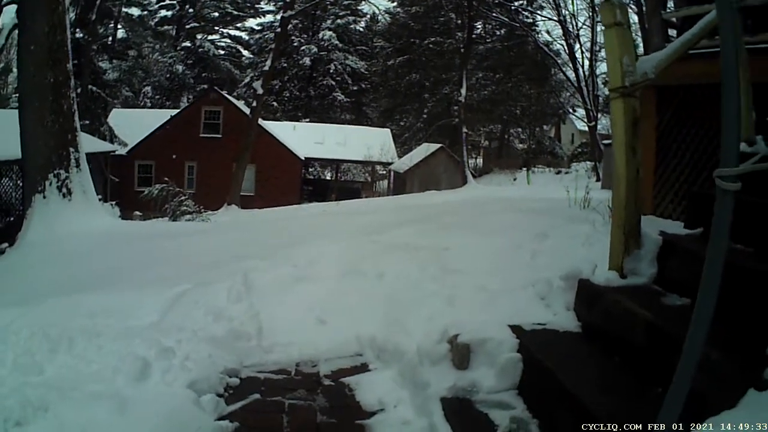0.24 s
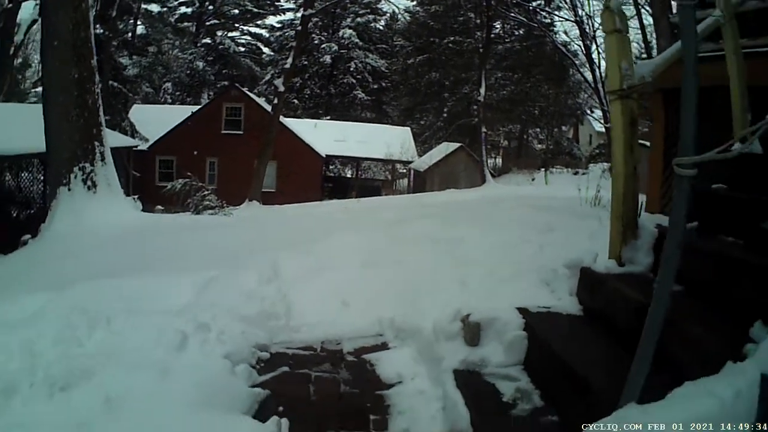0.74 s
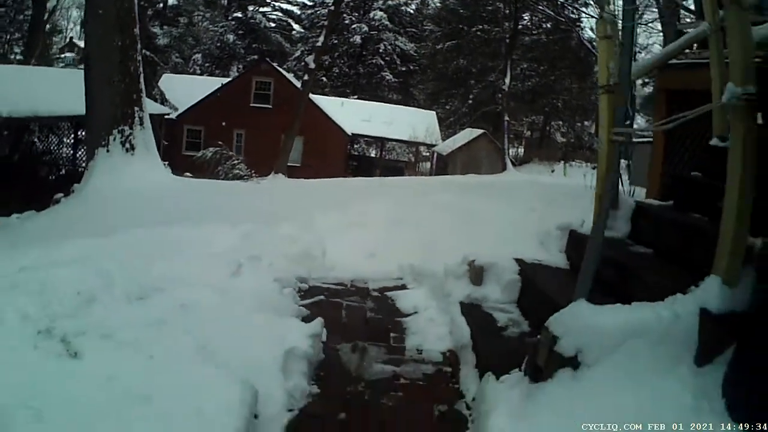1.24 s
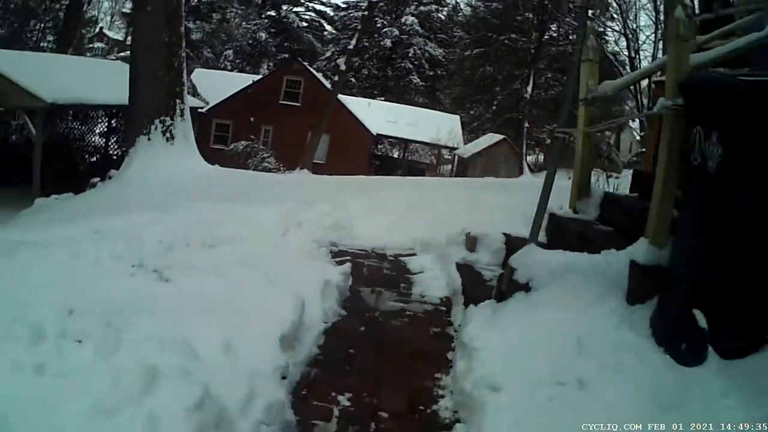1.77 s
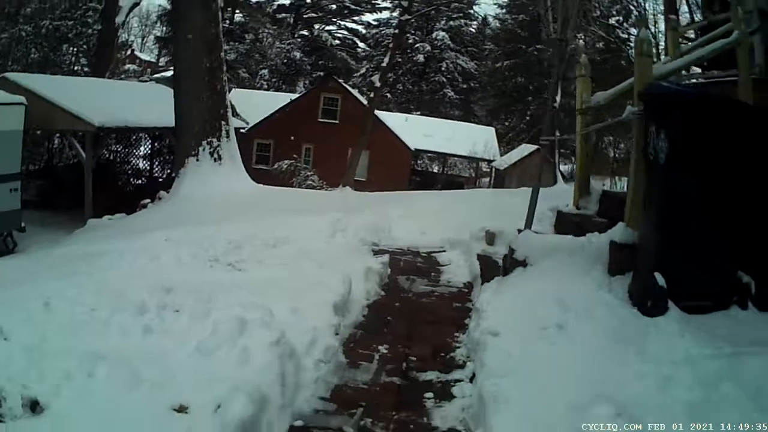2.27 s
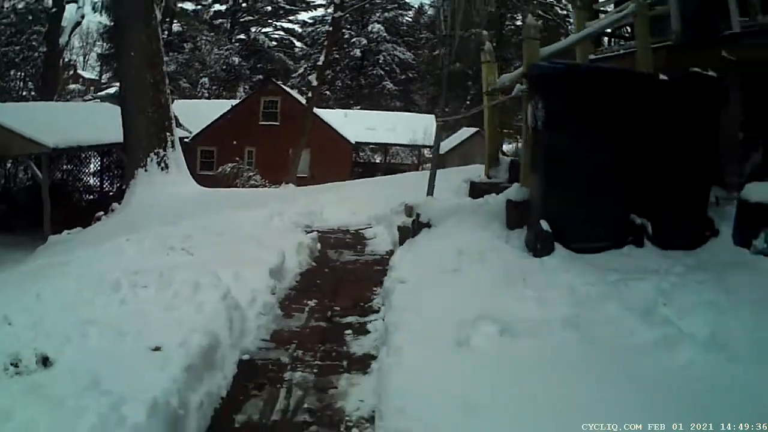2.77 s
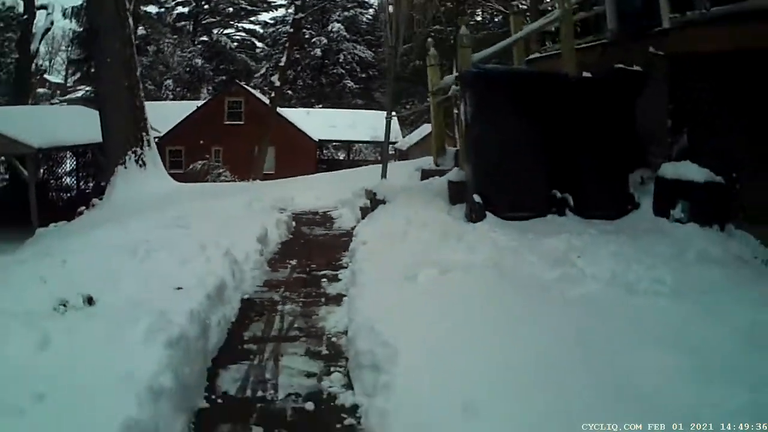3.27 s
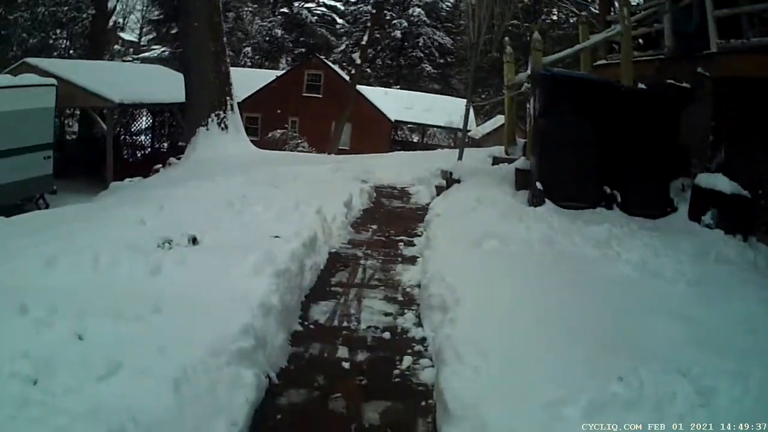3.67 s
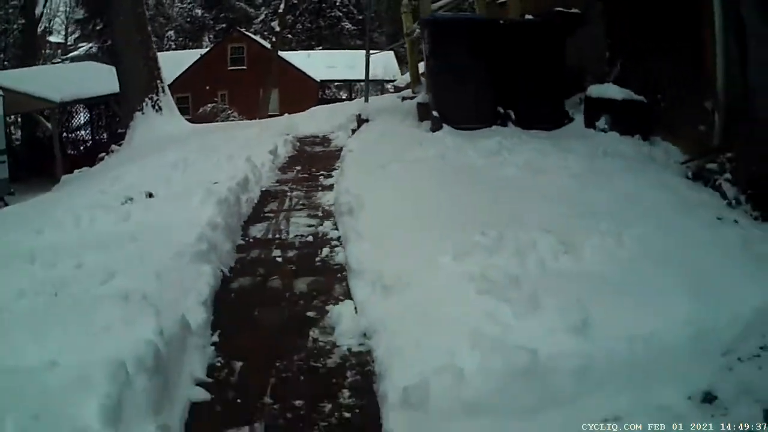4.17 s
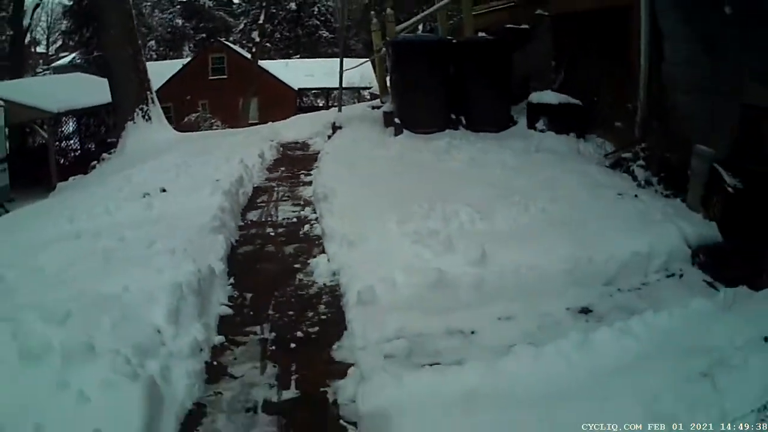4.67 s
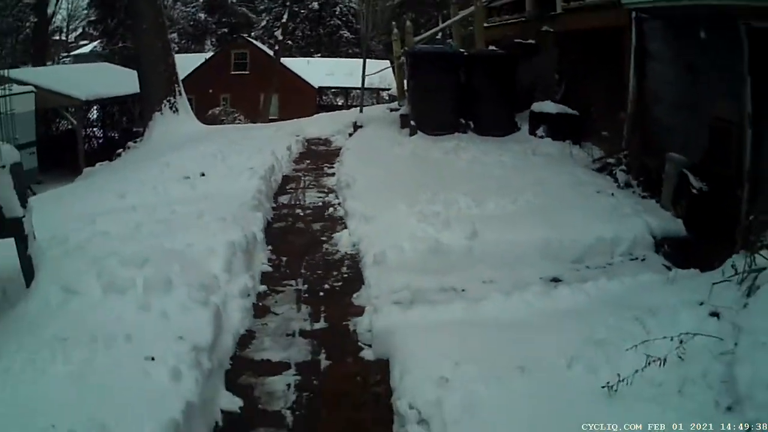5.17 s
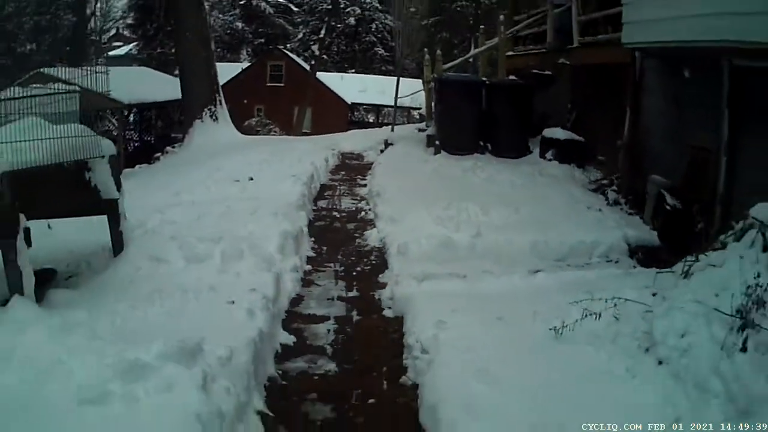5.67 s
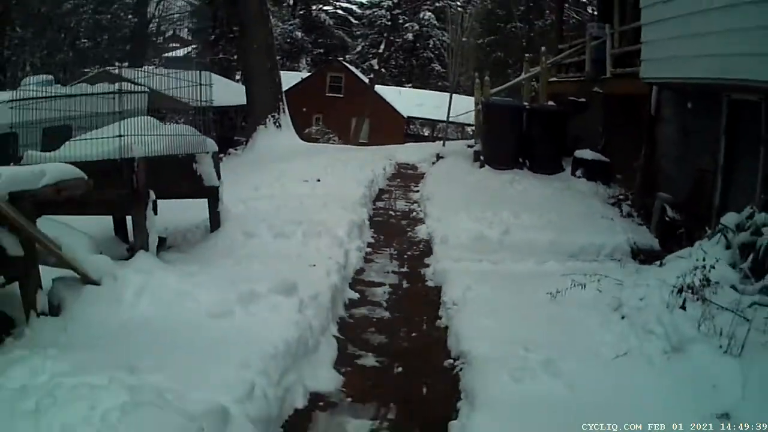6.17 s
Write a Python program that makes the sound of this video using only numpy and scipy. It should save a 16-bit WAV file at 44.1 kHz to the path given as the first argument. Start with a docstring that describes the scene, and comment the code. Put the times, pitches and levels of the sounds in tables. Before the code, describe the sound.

A faint outdoor hush and microphone hiss open the sound, with two light ticks at about half a second. Around 1 second a bicycle starts rolling slowly over a brick path, bringing a low, uneven rumble from the tyres and swaying frame, with faint crackling grit underneath. Bricks give irregular dull thumps, each with a short burst of plastic chatter from a mount, and small hard parts tick throughout. The rattling is stronger near 2 seconds and strongest just after 3 seconds, with closely spaced bumps until about 4.2 seconds. Another strong cluster with a sharp tick comes near 4.9 seconds. The ride eases briefly, then lighter bumps return from 5.7 seconds to the end at about 6.4. From 2.2 seconds on, a loose part occasionally gives a hollow knock. Everything is fairly quiet, close and without echo, heard from the bicycle itself.

```python
"""A quiet outdoor hush and microphone hiss, then a bicycle rolls slowly off down a brick path cleared
of snow, heard from a camera mounted on it. The frame sways, the tyres rumble, grit crackles and
small hard parts tick. Uneven bricks thump the frame and make the camera chatter in its plastic
mount; now and then a loose part falls back with a hollow knock."""
import sys
import numpy as np
from scipy.fft import rfft, irfft, next_fast_len
from scipy.io import wavfile
from scipy.ndimage import uniform_filter1d, map_coordinates

SR = 44100
rng = np.random.default_rng(int(sys.argv[2]) if len(sys.argv) > 2 else 0)


def transcribe(u):
    """Save the signal u as a 16-bit wav file named by the first command-line argument.

    u: samples, shape (n,) or (channels, n), limited to [-1, 1]; the rate is SR.
    q: integer samples, one column per channel.
    """
    v = np.clip(np.atleast_2d(u).T, -1, 1)
    q = np.round(v * 32767).astype(np.int16)
    wavfile.write(sys.argv[1], SR, q)


N = 282884


def amp(db):
    """Decibels to gain."""
    return 10 ** (np.asarray(db) / 20)


def unit(x):
    """Scale to rms 1."""
    return x / np.sqrt(np.mean(x ** 2) + 1e-20)


def gain(spectrum, hz):
    """Gain from (freq_hz, level_db) points on a log axis."""
    freq_hz, level_db = np.transpose(spectrum)
    return amp(np.interp(np.log(hz + 1), np.log(freq_hz + 1), level_db))


def curves(rows):
    """One value per sample for each column after the time."""
    time_s, *columns = np.transpose(rows)
    return [np.interp(np.arange(N) / SR, time_s, column) for column in columns]


def wobble(rate_hz):
    """Smooth curve through random knots."""
    knots = rng.standard_normal(int(N * rate_hz / SR) + 4)
    return map_coordinates(knots, [np.arange(N) * rate_hz / SR])


def filtered(x, response):
    """Apply a complex frequency response."""
    size = 2 * next_fast_len(len(x))
    return irfft(rfft(x, size) * response(np.fft.rfftfreq(size, 1 / SR)), size)[:len(x)]


def causal(magnitude):
    """Minimum-phase response: rings only after the blow."""
    cepstrum = irfft(np.log(np.maximum(magnitude, 1e-6)))
    half = len(cepstrum) // 2
    cepstrum[1:half] *= 2
    cepstrum[half + 1:] = 0
    return np.exp(rfft(cepstrum))


def noise(spectrum):
    """Coloured noise of rms 1."""
    return unit(filtered(rng.standard_normal(N), lambda hz: gain(spectrum, hz)))


def steady(x, window_s):
    """Reduce chance swells."""
    power = np.abs(uniform_filter1d(x * x, int(window_s * SR)))
    return x / np.sqrt(power + 0.42)


def add(track, start_s, sound):
    """Mix a sound into the track."""
    start = max(round(start_s * SR), 0)
    track[start:start + len(sound)] += sound[:max(len(track) - start, 0)]


# outdoor hush: freq_hz, density_db
HUSH_SPECTRUM = [(15, -3.5), (50, -4.5), (100, -5), (200, -2), (350, -5), (600, -8), (900, -7.5),
                 (1400, -15), (2200, -18), (3200, -19), (5000, -29.5), (12000, -32)]
# microphone self-noise: freq_hz, density_db
HISS_SPECTRUM = [(100, 5.5), (3000, 1.5), (5000, 0.5), (8000, -1), (12000, -1.5), (14500, -0.5),
                 (15600, -7.5)]


def background(hush_db=-66, drift_db=0.7, hiss_db=-68.5):
    """The drifting hush of a snowy garden and the microphone's own hiss."""
    hush = amp(hush_db + drift_db * wobble(rate_hz=2.5)) * noise(HUSH_SPECTRUM)
    return hush + amp(hiss_db) * noise(HISS_SPECTRUM)


# steady shaking between bumps: time_s, sway_db, rumble_db
RIDE_LEVELS = [(0.0, -67.5, -74), (0.64, -62, -71.5), (0.98, -51.5, -62.5), (1.32, -50, -61.5),
               (2.0, -56, -58), (2.14, -52.5, -52), (2.95, -50, -62), (3.36, -54.5, -53.5),
               (4.66, -52.5, -62), (5.02, -51.5, -74), (5.43, -53, -63), (6.41, -54, -59)]
# frame sway: freq_hz, density_db
SWAY_SPECTRUM = [(8, -14), (20, -4.5), (32, 5), (41, 8), (52, -5), (65, -1), (85, -26.5), (140, -61)]
# tyre rumble: freq_hz, density_db
RUMBLE_SPECTRUM = [(45, -35), (72, 2), (100, 6.5), (125, -0.5), (150, 0), (180, -7.5), (212, -14),
                   (250, -18), (330, -18), (600, -67.5)]


def rolling(sway_gain_db=3, rocking_db=3.8, uneven_db=2.2):
    """The frame sways and the tyres rumble over gritty bricks, more after each bump."""
    sway_db, rumble_db = curves(RIDE_LEVELS)
    bricks = wobble(rate_hz=13)
    heave = amp(1) * shudder(t60_s=0.18, growth=2.06)
    jolts = amp(-7) * shudder(t60_s=0.53, growth=1)
    sway_level = np.hypot(amp(sway_db + sway_gain_db + rocking_db * bricks), heave)
    rumble_level = np.hypot(amp(rumble_db + uneven_db * bricks), jolts)
    sway = sway_level * steady(noise(SWAY_SPECTRUM), window_s=0.041)
    rumble = rumble_level * steady(noise(RUMBLE_SPECTRUM), window_s=0.0394)
    return sway + rumble + grit(load=np.hypot(amp(rumble_db), jolts))


def grit(load, base_db=-79.5, rise_db_per_s=1.65, flicker_db=3.5):
    """Grit crackles under the tread, louder as speed builds and as the tyres press harder."""
    crackle = unit(filtered(contacts(N, rate_hz=700, scatter_db=1.5), shell))
    pressure = np.sqrt(load / np.median(load))
    level_db = base_db + rise_db_per_s * np.arange(N) / SR + flicker_db * wobble(rate_hz=35)
    return amp(level_db) * pressure * crackle


def contacts(size, rate_hz, scatter_db):
    """Tiny impacts of uneven strength at random moments."""
    hits = rng.random(size) < rate_hz / SR
    signs = np.sign(rng.standard_normal(size))
    return hits * signs * amp(scatter_db * np.clip(rng.standard_normal(size), -2, 2))


# camera shell and mount resonances: centre_hz, width_hz, level_db
SHELL_MODES = [(609, 24, -1), (916, 79, -4.5), (1226, 62, -5), (1370, 21, -12.5), (1730, 18, -24),
               (2140, 37, -11.5), (2280, 22, -33), (3030, 27, -14), (3340, 80, -15), (3680, 83, -16),
               (4280, 45, -18), (4800, 53, -21)]
# broad plastic clack: freq_hz, density_db
CLACK_SPECTRUM = [(150, -36.5), (300, 1), (600, -3), (760, -5.5), (1100, -2), (1700, -6), (2300, -5),
                  (3300, -9), (4100, -15.5), (5000, -26.5), (8000, -41), (15000, -68)]


def shell(hz, ring_db=6, damp_hz=5000):
    """Response of the plastic shell: a broad clack with narrow resonances standing out."""
    ring_power = sum(np.abs(amp(db) * hz * width / (centre ** 2 - hz ** 2 + 1j * hz * width)) ** 2
                     for centre, width, db in SHELL_MODES)
    damping = 1 / (1 + (hz / damp_hz) ** 8)
    return causal(np.sqrt(gain(CLACK_SPECTRUM, hz) ** 2 + amp(ring_db) ** 2 * ring_power * damping))


def tap(pitch_hz, ring_t60_s, colour, snap_db, snap_t60_s, attack_s=0.0003):
    """One light contact of peak 1: ring plus noise snap; a sharper one stirs a lower mode more."""
    t = np.arange(SR // 20) / SR
    phase = 2 * np.pi * pitch_hz * t
    modes = np.sin(phase) + amp(min(snap_db, 0) - 1) * np.sin(0.786 * phase)
    ring = modes * amp(-60 * t / ring_t60_s) * (1 - np.exp(-t / attack_s))
    snap = filtered(rng.standard_normal(len(t)) * amp(-60 * t / snap_t60_s), colour)
    sound = unit(ring) + amp(snap_db) * unit(snap)
    return sound / np.abs(sound).max()


# clearest ticks of small parts: start_s, peak_db, pitch_hz, snap_db
PART_TICKS = [(0.445, -49, 3100, -26), (0.4963, -52, 2690, -13), (0.9457, -49, 3050, -24),
              (1.067, -53, 3130, -19), (1.0868, -44.5, 3400, -6), (1.2254, -48.5, 2600, -3),
              (1.342, -49.5, 3180, -23), (2.851, -45.5, 3580, 8), (2.8786, -45, 2800, -9),
              (2.9891, -49, 2940, -24), (3.3942, -41.5, 2500, -32), (3.6087, -49.5, 4160, -6),
              (3.935, -43, 3600, -11), (4.2108, -43, 2160, -7), (4.394, -48, 3630, 0),
              (4.8504, -49, 2650, -9), (4.9264, -35, 2220, -13), (5.1184, -42.5, 3420, 1),
              (5.2609, -53, 3140, -8), (5.3966, -48, 3470, -4), (5.6103, -49, 2600, -4),
              (5.7858, -49, 3020, -14), (5.8087, -48, 2340, -4), (5.8651, -45, 3270, 2),
              (5.9085, -44.5, 2370, -26)]


def ticks(ring_t60_s=0.0069, snap_gain_db=8):
    """Small hard parts touch; the sharper ones snap more than they ring."""
    out = np.zeros(N)
    snap_spectrum = [(300, -28), (900, 3), (1700, 2.5), (2700, 2.5), (3900, 9), (5000, -4.5),
                     (7500, -10.5), (10000, -22), (15000, -21)]
    colour = lambda hz: causal(gain(snap_spectrum, hz))
    for start_s, peak_db, pitch_hz, snap_db in list(PART_TICKS) + faint_ticks(count=11):
        tick = tap(pitch_hz, ring_t60_s, colour, snap_db + snap_gain_db, snap_t60_s=0.012)
        add(out, start_s + 0.0006, amp(peak_db) * tick)
    return out


def faint_ticks(count, under_way_s=0.9, spread_db=5, spread_octaves=0.29, snap_db=-13):
    """Rows of random light ticks that crowd together as speed builds."""
    when, size, pitch = rng.random((count, 3)).T
    start_s = under_way_s + np.sqrt(when) * (N / SR - under_way_s)
    peak_db = -54.5 + spread_db * (size - 0.5)
    pitch_hz = 2980 * 2 ** (spread_octaves * (pitch - 0.5))
    return [(*row, snap_db) for row in zip(start_s, peak_db, pitch_hz)]


# uneven bricks: start_s, length_s, chatter_db, edge_db (treble re chatter), thump_db
BRICK_BUMPS = [(1.047, .01, -70, -10, -52), (1.083, 0.021, -65.5, -15, -39), (1.101, 0.0063, -54, -7, -61),
               (1.385, 0.0061, -62.5, -14, -50.5), (1.46, 0.025, -62, -17, -41),
               (1.628, .012, -64.5, -16, -48), (1.701, 0.015, -60, -14, -43.5),
               (1.733, 0.032, -61, -22, -44.5), (1.971, 0.017, -58.5, -7.5, -44),
               (2.053, 0.023, -49.5, -9.5, -39.5), (2.13, 0.028, -56.5, -12.5, -42),
               (2.249, .016, -63.5, -8, -48), (2.374, 0.032, -69, 3.5, -44.5), (2.432, 0.019, -64, -6, -48),
               (2.58, 0.017, -67.5, -2, -46.5), (2.738, 0.021, -68, -19, -43), (3.04, .01, -86, -14, -44.5),
               (3.125, 0.036, -56, -5.5, -37), (3.137, 0.015, -43, -7.5, -34.5),
               (3.157, 0.017, -50, -8, -35.5), (3.216, 0.013, -49, -18, -39), (3.389, 0.016, -53.5, 0, -58),
               (3.405, 0.025, -56, -6, -50), (3.435, 0.026, -58, -13, -42), (3.491, 0.029, -56, -13, -37),
               (3.606, 0.0068, -56, -29, -43.5), (3.713, 0.029, -55.5, -11.5, -39.5),
               (3.793, 0.026, -57.5, -20, -42.5), (3.823, 0.036, -53.5, -10.5, -38),
               (3.937, 0.0063, -61.5, 3.5, -60), (4.036, 0.011, -58, -11, -45),
               (4.19, .022, -53.5, -9, -40), (4.222, 0.024, -55, -16, -41.5),
               (4.393, .009, -60.5, 2.5, -53.5), (4.543, 0.0091, -72.5, 9.5, -50),
               (4.762, 0.032, -63, -6.5, -42), (4.897, 0.022, -48.5, -4.5, -36),
               (4.913, 0.022, -45.5, -5, -35.5), (4.934, 0.034, -56.5, -13, -43),
               (4.986, 0.012, -58, -18, -42.5), (5.118, .01, -73, -8, -54), (5.257, .02, -65, -21, -47),
               (5.733, 0.012, -61.5, -1, -44), (5.816, 0.011, -70, -10, -49),
               (5.909, 0.022, -52.5, -8.5, -42.5), (5.948, 0.024, -63.5, -1, -40.5),
               (6.24, 0.028, -60.5, -5, -45.5), (6.316, .025, -55.5, -10.5, -42.5)]


def chatter(treble_gain_db=-1.5, split_hz=1900, release_t60_s=0.022):
    """Each bump shakes the mount into a burst of contacts; sharp brick edges make it brighter."""
    out, t = np.zeros(N), np.arange(4096) / SR
    hz = np.fft.rfftfreq(len(t), 1 / SR)
    clack = shell(hz)
    lowpass = 1 / (1 + (hz / split_hz) ** 8)
    for start_s, length_s, chatter_db, edge_db, _ in BRICK_BUMPS:
        climb_s = 0.76 * length_s  # shaking holds while the tyre climbs the brick
        shake = amp(-60 * np.maximum(t - climb_s, 0) / release_t60_s)
        train = contacts(len(t), rate_hz=1500, scatter_db=2) * shake
        train[0] = 2.6  # the first contact is the firmest
        spectrum = rfft(train) * clack
        bands = ((lowpass, chatter_db), (1 - lowpass, chatter_db + edge_db + treble_gain_db))
        tone = sum(amp(db) * band / np.linalg.norm(irfft(spectrum * band)) for band, db in bands)
        add(out, start_s, np.sqrt(length_s * SR) * irfft(spectrum * causal(tone)))
    return out


# frame and fork on the tyres: pitch_hz, level_db, t60_s
FRAME_MODES = [(40.3, -1, 0.28), (62.4, 4, 0.073), (91.3, 9, 0.063), (117, 3.5, 0.12), (153, 1, 0.1),
               (203.3, -0.5, 0.074), (255, -7.5, 0.13)]


def thumps(gain_db=-2, lead_s=0.0022, rise_s=0.0044, pivot_hz=100, no_tilt_db=-56.5, scatter_db=1.8):
    """Each bump bounces the frame on its tyres; an abrupt, hard-chattering one stirs higher modes."""
    out, t = np.zeros(N), np.arange(SR // 4) / SR
    pitch_hz, level_db, t60_s = np.transpose(FRAME_MODES)[:, :, None]
    octaves = np.maximum(np.log2(pitch_hz / pivot_hz), 0)
    for start_s, _, chatter_db, _, thump_db in BRICK_BUMPS:
        tilt_db_per_octave = 0.5 * (chatter_db - no_tilt_db)
        strength, detune, side = rng.standard_normal((3, len(FRAME_MODES), 1))
        weights = np.sign(side) * amp(level_db + tilt_db_per_octave * octaves + scatter_db * strength)
        phase = 2 * np.pi * pitch_hz * (1 + 0.04 * detune) * t
        modes = weights * amp(-60 * t / t60_s) * np.sin(phase)
        bounce = modes.sum(axis=0) * (1 - np.exp(-t / rise_s))
        add(out, start_s - lead_s, amp(thump_db + gain_db) * bounce / np.std(bounce[:SR // 40]))
    return out


def shudder(t60_s, growth, rise_s=0.03, full_jolt_db=-35.5):
    """Envelope of the shaking left by the bumps; growth is its dB per dB of thump."""
    power, t = np.zeros(N), np.arange(SR // 2) / SR
    shape = np.minimum(t / rise_s, 1) * amp(-60 * np.maximum(t - rise_s, 0) / t60_s)
    for start_s, *_, thump_db in BRICK_BUMPS:
        level_db = full_jolt_db + growth * (thump_db - full_jolt_db)
        add(power, start_s - rise_s, (amp(level_db) * shape) ** 2)
    return np.sqrt(power)


# loose parts falling back: start_s, peak_db, pitch_hz
HOLLOW_KNOCKS = [(2.250, -47, 620), (2.746, -45.5, 610), (3.243, -40, 566), (3.527, -41.5, 600),
                 (4.036, -49, 690), (5.004, -39.5, 560), (5.276, -47.5, 750), (5.949, -48, 804)]


def knocks():
    """A loose part drops back on its seat and sounds the hollow shell."""
    out = np.zeros(N)
    for start_s, peak_db, pitch_hz in HOLLOW_KNOCKS:
        knock = tap(pitch_hz, ring_t60_s=0.017, colour=shell, snap_db=-8, snap_t60_s=0.006)
        add(out, start_s, amp(peak_db) * knock)
    return out


def scene():
    """Everything reaches the one microphone directly; snow leaves no echo."""
    return (chatter() + thumps() + ticks() + knocks() + rolling() + background())[None]


def record(dry):
    """The camera limits the band and adds a small constant offset."""
    top_hz, offset = 15665, 0.0085
    return filtered(dry[0], lambda hz: hz < top_hz)[None] + offset


dry = scene()
out = record(dry)
transcribe(out)
```